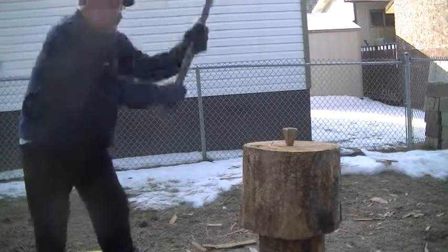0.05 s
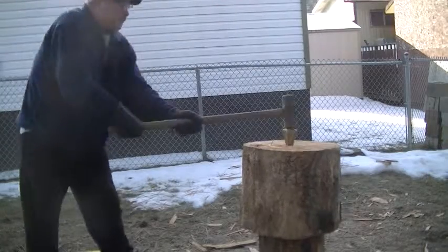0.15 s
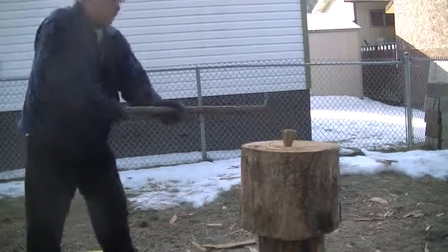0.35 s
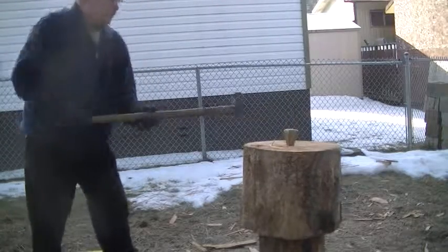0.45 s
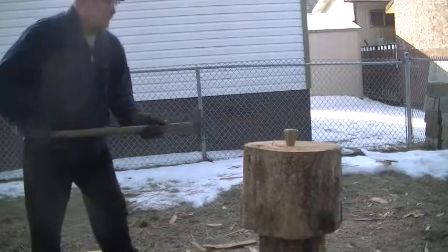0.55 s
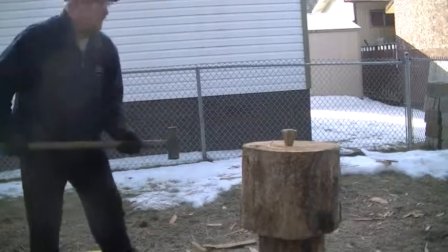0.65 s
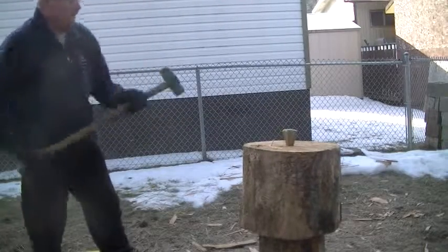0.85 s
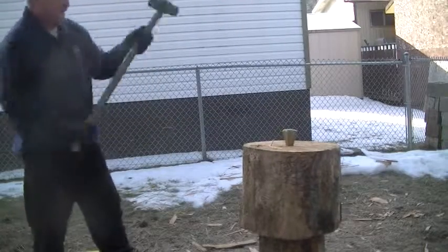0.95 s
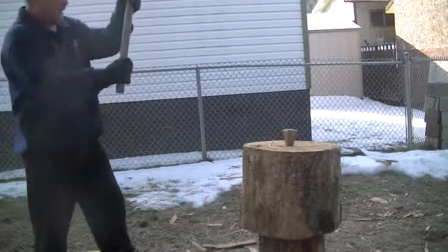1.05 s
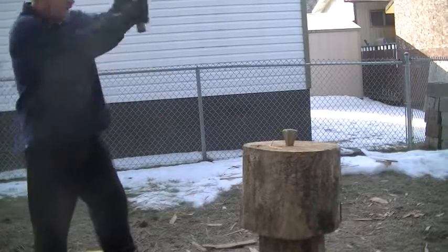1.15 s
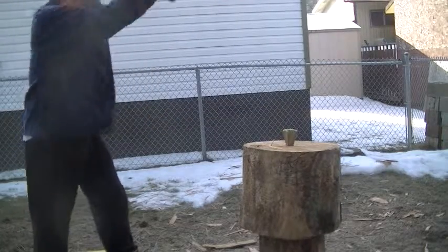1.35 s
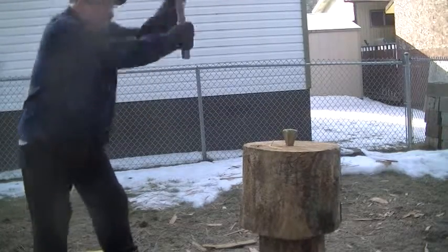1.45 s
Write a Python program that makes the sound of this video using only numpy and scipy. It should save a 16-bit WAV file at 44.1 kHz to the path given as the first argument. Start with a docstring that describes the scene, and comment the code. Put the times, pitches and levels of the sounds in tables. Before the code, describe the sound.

One loud hammer blow on a metal wedge in a log, ringing and echoing outdoors.

```python
"""A steel maul hits a wedge standing in a log, in a back yard: one hard crack that overloads the mic.
The steel rings, block and ground boom. House walls slap the crack back and the neighbourhood scatters
it into a long wash. The maul head sings on, high and thin, Doppler-bent as it is swung away.
Small ticks, soft steps, a faint drone and a jacket's rustle follow, over town noise, hum and mic hiss."""
import sys
import numpy as np
from scipy import signal
from scipy.fft import rfft, irfft
from scipy.io import wavfile

SR = 44100
rng = np.random.default_rng(int(sys.argv[2]) if len(sys.argv) > 2 else 0)


def master(y):
    """Save y as 16-bit WAV."""
    cut = np.clip(np.atleast_2d(y).T, -1, 1)
    pcm = np.round(cut * 32767)  # scale
    wavfile.write(sys.argv[1], SR, pcm.astype(np.int16))


N = 66150
T = np.arange(N) / SR
HZ = np.maximum(np.fft.rfftfreq(N, 1 / SR), 1)
BLOW_S = .2321

# stereo side signal of a close mic pair [f/Hz, level/dB re mid]
SIDE_SPECTRUM = [(60, -34.5), (250, -44), (500, -25.5), (1000, -21.5), (2200, -18.5), (7000, -15.5),
                 (8700, -9), (11000, -44)]
# distant town [f/Hz, relative level/dB]
TOWN_SPECTRUM = [(25, -19), (60, -4.5), (100, -4.5), (200, -4), (350, -3.5), (700, -6.5), (1500, -10),
                 (3000, -20.5), (6000, -29), (10000, -37), (15000, -44)]
# mic self-noise [f/Hz, relative level/dB]
HISS_SPECTRUM = [(30, -15), (100, 0), (250, 4), (600, 2.5), (1500, -2.5), (3000, -7.5), (6500, -21.5),
                 (10000, -56)]
# maul-wedge contacts [t/s after the blow, gain/dB]
MAUL_CONTACTS = [(-.0014, -38), (0, 4), (.0024, -13.5)]
# splintering crack [f/Hz, relative level/dB]
CRACK_SPECTRUM = [(100, -29), (350, 2), (600, 3), (1200, -2), (2800, -2), (4500, -3), (8000, -10),
                  (11000, -23), (15000, -36.5)]
# wedge in the log [f/Hz, relative level/dB, t60/s]
WEDGE_MODES = [(393, -10.5, 0.011), (560, -9, .016), (825, -16, 0.042), (1000, -15, 0.026),
               (1273, -9.5, 0.026), (1666, -13, 0.016), (2167, -10.5, 0.015), (2890, -12, 0.016),
               (3710, -14, .012), (4600, -6, 0.0091), (5060, -16.5, 0.017), (6620, -20, .009)]
# long rings of wedge and maul [f/Hz]
STEEL_MODES_HZ = [786, 821, 1130, 1216, 2178, 2903, 7577, 13295]
# the same rings, row by row [level/dB, t60/s]
STEEL_DECAYS = [(-32.5, 1.2), (-36, 0.55), (-38, 1.4), (-30.5, 0.57), (-38, 0.63), (-38, 0.82), (-37, .52),
                (-53, .58)]
# block on the ground [f/Hz, level/dB, t60/s]
BOOM_MODES = [(77.6, -37, 1.0), (98.5, -36, 1), (147.4, -32, 0.35)]
# note of the maul head as it turns and travels [t/s, level/dB]
SING_ENVELOPE = [(.232, -49.5), (.3, -53.5), (.34, -36.5), (.37, -37.5), (.392, -48), (.425, -36.5),
                 (.55, -40.5), (.577, -48.5), (.605, -40), (.638, -53), (.665, -42.5), (.78, -54),
                 (.822, -69), (.85, -57.5), (1, -62.5), (1.2, -74), (1.5, -90.5)]
# head speed towards the mic [t/s, v/(m/s)]
HEAD_SPEED = [(.232, 0), (.5, 0.17), (.75, 0.072), (.92, 1.37), (1.2, -1.7), (1.5, 1.95)]
# scattered echoes [f/Hz, relative level/dB, t60/s]
WASH_BANDS = [(30, -30, 0.78), (55.7, -25.5, 0.91), (78, -9, 0.84), (113, -11.5, 0.7), (202, -3, 0.4),
              (373, -6.5, 0.51), (679, -5.5, 0.58), (1280, -1, 0.66), (2020, -2.5, 0.61), (3440, -7, 0.55),
              (4900, -12.5, 0.44), (5940, -23.5, .45), (7700, -23.5, 0.23), (10600, -37.5, 0.13),
              (14000, -51, 0.33)]
# notes standing out of the wash [f/Hz, width/Hz, level/dB]
WASH_PEAKS = [(796, 40, -39.5), (1190, 66, -34.5), (2158, 170, -35)]
# nearest walls' echoes [t/s, level/dB, f/Hz, sigma/oct, sigma/s]
WALL_SLAPS = [(.2642, -13.5, 2160, 0.87, 0.0017), (.280, -20.5, 1540, 0.15, 0.0026),
              (.3003, -15, 1570, .4, 0.0018), (.36, -19.5, 1450, 0.97, 0.0032)]
# chips and grit [t/s, pre-filter level/dB, f/Hz, sigma/oct, t60/s]
GRIT_TICKS = [(0.508, -46, 11700, 0.11, .025), (.559, -54, 6000, 0.39, .015),
              (.644, -42, 6300, 0.53, 0.011), (.645, -58, 13500, .12, .02), (0.651, -38, 3900, 0.48, 0.03),
              (0.729, -59, 10900, 0.14, 0.06), (0.785, -51, 5500, 0.59, .012), (.862, -66, 11400, .3, .02),
              (1.401, -35, 1880, 0.4, 0.027), (1.418, -44, 1000, 0.79, 0.02),
              (1.436, -45, 420, 0.28, 0.053), (1.445, -39.5, 2260, 0.33, 0.019)]
# steps on soil [t/s, level/dB]
FOOTFALLS = [(.76, -40), (0.857, -41.5)]
# swells of a faint drone [t/s, level/dB, sigma/s]
DRONE_SWELLS = [(0.799, -53.5, 0.059), (.95, -52.5, 0.07), (1.291, -54, 0.062)]
# jacket and boots rubbing [t/s, level/dB, f/Hz, sigma/oct, sigma/s]
RUBS = [(.94, -51.5, 881.6, 1.19, 0.16), (1.18, -50.5, 1810, 0.95, 0.065), (1.18, -71.5, 10500, 0.2, .05),
        (1.29, -51, 1410, 0.77, 0.081), (1.31, -57.5, 4540, 0.1, 0.018), (1.43, -49.5, 632, 1.18, 0.023)]


def undb(db):
    return 10 ** (np.asarray(db) / 20)


def noise(gain):
    """Unit-rms noise with the given spectral shape."""
    x = irfft(gain * np.exp(2j * np.pi * rng.random(len(HZ))), N)
    return x / (x.std() + 1e-18)


def colour(points):
    """Spectral gain from (f/Hz, level/dB) points."""
    hz, db = np.array(points).T
    return undb(np.interp(np.log(HZ), np.log(hz), db))


def stereo_noise(gain, side_db=0):
    """Mid/side noise at two closely spaced mics."""
    side_gain = gain * colour(SIDE_SPECTRUM)
    side = noise(side_gain) * np.sqrt(np.sum(side_gain ** 2) / np.sum(gain ** 2))
    return noise(gain) + undb(side_db) * side * np.array([[1], [-1]])


def bell(hz, octaves):
    """Gaussian band on a log-frequency axis."""
    return np.exp(-.5 * (np.log2(HZ / hz) / octaves) ** 2)


def fade(start_s, t60_s):
    """Unity until the start, then exponential decay."""
    return np.exp(-np.log(1000) * np.maximum(T - start_s, 0) / t60_s)


def hit(start_s, t60_s):
    """Instant attack, exponential decay."""
    return (T >= start_s) * fade(start_s, t60_s)


def swell(centre_s, sigma_s):
    """Gaussian rise and fall."""
    return np.exp(-.5 * ((T - centre_s) / sigma_s) ** 2)


def noise_swells(rows, side_db):
    """Noise bands that each rise and fall once."""
    return sum(undb(db) * swell(at_s, sigma_s) * stereo_noise(bell(hz, octaves), side_db)
               for at_s, db, hz, octaves, sigma_s in rows)


def ring(modes, start_s):
    """Decaying modes struck together."""
    return sum(undb(db) * hit(start_s, t60_s) * np.sin(2 * np.pi * hz * (T - start_s))
               for hz, db, t60_s in modes)


def town(level_db=-52.5):
    """Steady, dull noise of a distant town."""
    return undb(level_db) * stereo_noise(colour(TOWN_SPECTRUM))


def hum(start_hz=275.2, fall_hz_per_s=2.76, rms_db=-56):
    """Distant tone, sinking slightly; pitch and level waver."""
    pitch_hz = start_hz - fall_hz_per_s * T + 2.5 * noise(bell(3.2, 1))
    level_db = rms_db + 2.9 * noise(bell(3.6, 1))
    return undb(level_db) * np.sqrt(2) * np.sin(2 * np.pi * np.cumsum(pitch_hz) / SR)


def mic_hiss(level_db=-63):
    """Self-noise, independent left and right."""
    return undb(level_db) * np.array([noise(colour(HISS_SPECTRUM)) for _ in range(2)])


def blow(crack_t60_s=.013, ceiling_db=.5, highpass_hz=244):
    """Maul grazes the wedge, strikes, strikes again; the crack saturates and carries little bass."""
    impact = 0
    for lag_s, db in MAUL_CONTACTS:
        at_s = BLOW_S + lag_s
        crack = undb(-5) * hit(at_s, crack_t60_s) * stereo_noise(colour(CRACK_SPECTRUM), side_db=-5.5)
        impact += undb(db) * (crack - ring(WEDGE_MODES, at_s))
    saturated = undb(ceiling_db) * np.tanh(impact / undb(ceiling_db))
    return signal.sosfilt(signal.butter(4, highpass_hz, "high", fs=SR, output="sos"), saturated)


def steel_ring(full_s=.34, waver_db=4, waver_hz=7.8):
    """Steel rings on, ducked after the blow and swelling as mic gain recovers; each note wavers."""
    recovery = undb(np.interp(T, [BLOW_S, full_s], [-8, 0]))
    return recovery * sum(ring([(hz, db, t60_s)], BLOW_S) * undb(waver_db * noise(bell(waver_hz, .91)))
                          for hz, (db, t60_s) in zip(STEEL_MODES_HZ, STEEL_DECAYS))


def block_boom(rise_s=.087):
    """Block and ground build up a soft low boom."""
    return np.clip((T - BLOW_S) / rise_s, 0, 1) * ring(BOOM_MODES, BLOW_S)


def maul_head(note_hz=8662, echo_s=.035, echo_db=-18.5, scatter_db=-15, flutter_db=1.3, flutter_hz=30):
    """One high note, Doppler-bent by the swing; its wall echo bends the other way and beats with it."""
    travel_m = np.cumsum(np.interp(T, *np.array(HEAD_SPEED).T)) / SR
    lead_s = travel_m / 343  # speed of sound, m/s
    level_db = np.interp(T, *np.array(SING_ENVELOPE).T) + flutter_db * noise(bell(flutter_hz, .25))
    direct = (T > BLOW_S) * np.sin(2 * np.pi * note_hz * (T + lead_s))
    echo = (T > BLOW_S + echo_s) * np.sin(2 * np.pi * note_hz * (T - lead_s))
    scatter = (T > BLOW_S) * stereo_noise(bell(note_hz, .004))
    return undb(level_db) * np.sqrt(2) * (direct + undb(echo_db) * echo + undb(scatter_db) * scatter)


def wash(level_db=-21, full_s=.29, fall_s=.38, far_db=-10.5, far_t60_ratio=1.554 / .66, peak_t60_s=.98):
    """The wash starts ducked by the crack, swells as mic gain recovers, then dies, treble first."""
    bands = np.array(WASH_BANDS)
    spectrum = colour(bands[:, :2])
    echoes = 0
    for t60_s, one_hot in zip(bands[:, 2], np.eye(len(bands))):
        crossfade = np.interp(np.log(HZ), np.log(bands[:, 0]), one_hot)
        gain = spectrum * np.sqrt(crossfade)
        rms_share = np.sqrt(np.sum(gain ** 2) / np.sum(spectrum ** 2))
        far_tail = undb(far_db) * fade(fall_s, far_t60_ratio * t60_s)
        decay = np.hypot(fade(fall_s, t60_s), far_tail)
        echoes += undb(level_db) * rms_share * decay * stereo_noise(gain)
    for hz, width_hz, db in WASH_PEAKS:
        peak = 1 / (1 + (2 * (HZ - hz) / width_hz) ** 2)
        echoes += undb(db) * fade(fall_s, peak_t60_s) * stereo_noise(peak)
    recovery = (T > BLOW_S) * undb(np.interp(T, [BLOW_S, full_s], [-8, 0]))
    return recovery * echoes


def wall_slaps():
    """The nearest walls return the crack as short bursts."""
    return noise_swells(WALL_SLAPS, side_db=-16)


def ticks():
    """Chips and grit click drily, each filtered to its band."""
    clicks = 0
    for at_s, db, hz, octaves, t60_s in GRIT_TICKS:
        burst = hit(at_s, t60_s) * stereo_noise(bell(hz, octaves))
        clicks += undb(db) * irfft(rfft(burst) * bell(hz, 2 * octaves), N)
    return clicks


def steps(thud_hz=80, rise_s=.0069, t60_s=.31):
    """Boots thud dully on soil."""
    thuds = 0
    for at_s, db in FOOTFALLS:
        envelope = np.clip((T - at_s) / rise_s, 0, 1) * fade(at_s, t60_s)
        thud = np.sin(2 * np.pi * thud_hz * (T - at_s)) + undb(-8.5) * noise(bell(115, .86))
        thuds += undb(db) * envelope * thud
    return thuds


def drone(centre_hz=567):
    """A faint narrow noise band comes and goes."""
    envelope = sum(undb(db) * swell(at_s, sigma_s) for at_s, db, sigma_s in DRONE_SWELLS)
    return envelope * noise(bell(centre_hz, .1))


def rustle():
    """Jacket and boots rub in soft swells."""
    return noise_swells(RUBS, side_db=-16)


def scene():
    background = town() + hum() + mic_hiss()
    strike = blow() + steel_ring() + block_boom() + maul_head() + wall_slaps() + wash()
    return background + strike + ticks() + steps() + drone() + rustle()


def record(dry):
    """The mic rounds off the crack's peaks; steep low-pass."""
    lowpass_hz = 15200
    rounded = dry / (1 + dry ** 6) ** (1 / 6)
    return signal.sosfilt(signal.ellip(10, .2, 90, lowpass_hz, fs=SR, output="sos"), rounded)


dry = scene()
out = record(dry)
master(out)
```